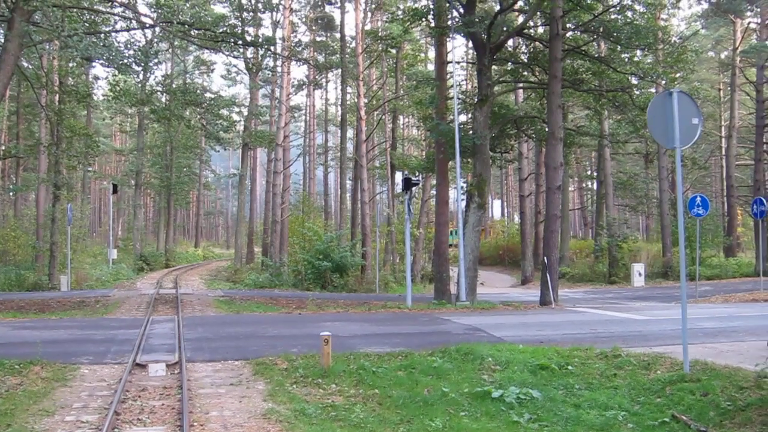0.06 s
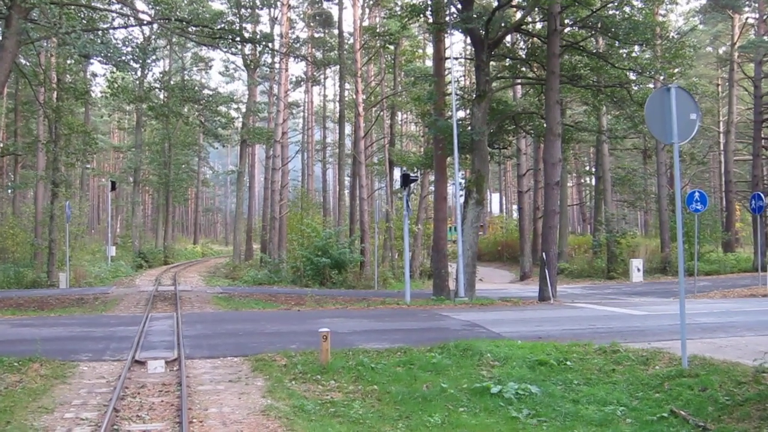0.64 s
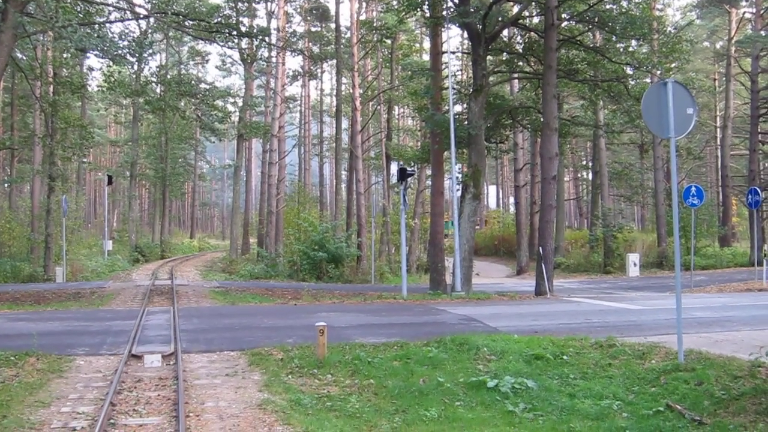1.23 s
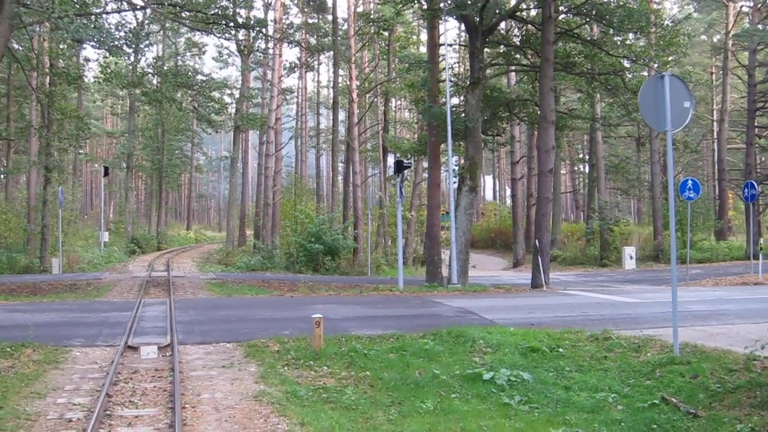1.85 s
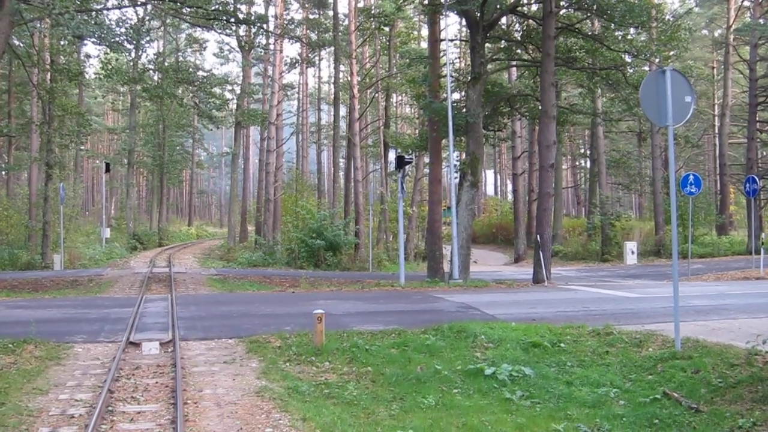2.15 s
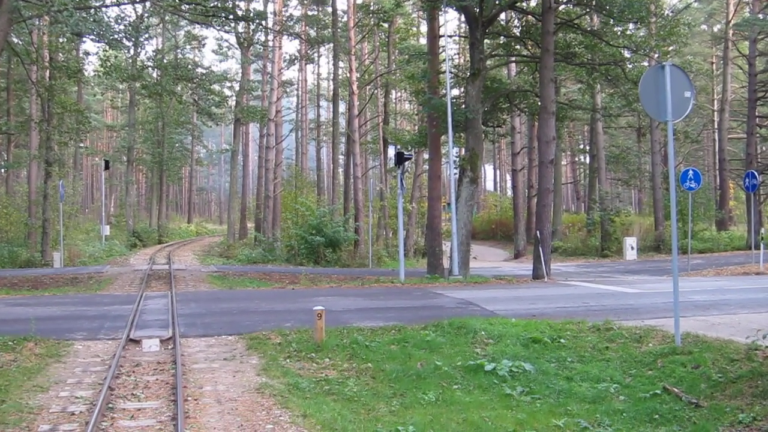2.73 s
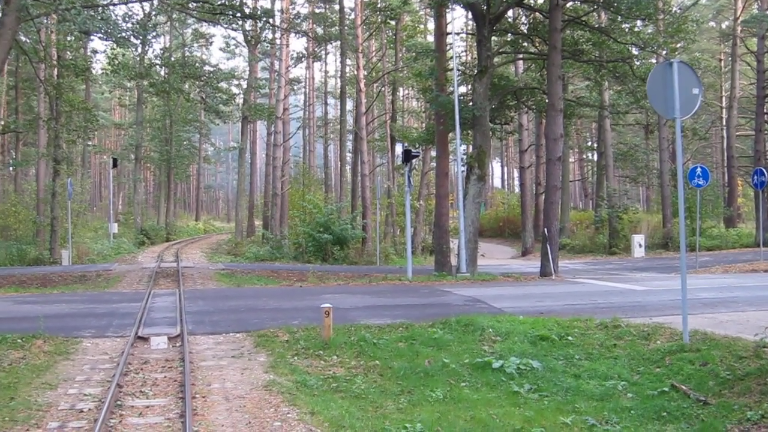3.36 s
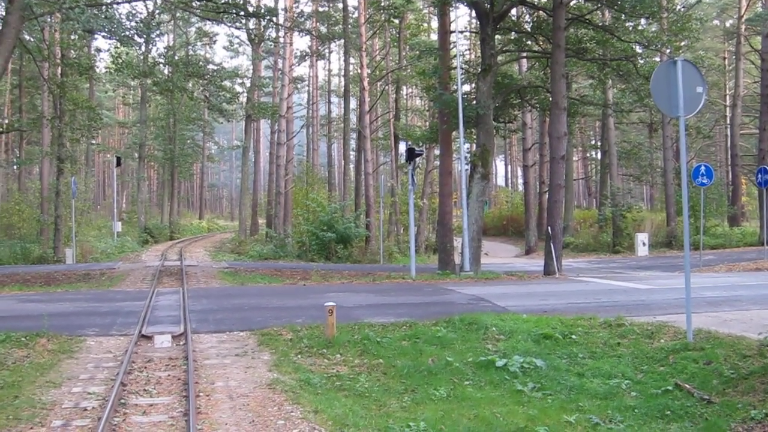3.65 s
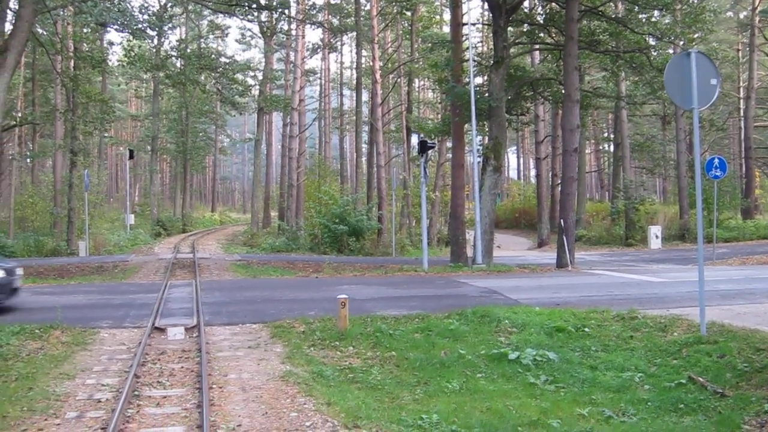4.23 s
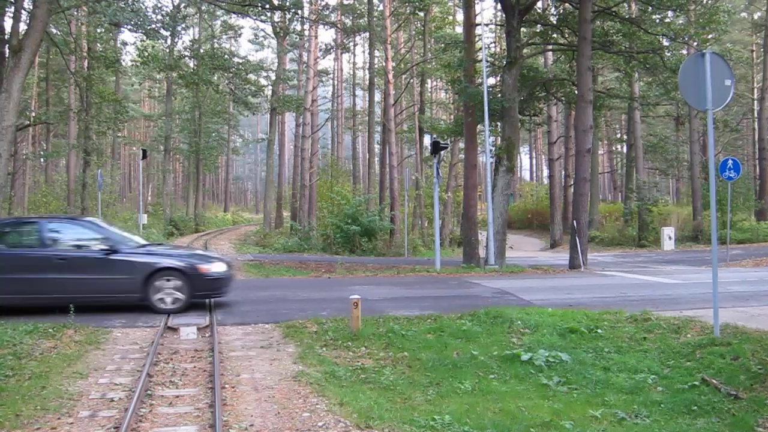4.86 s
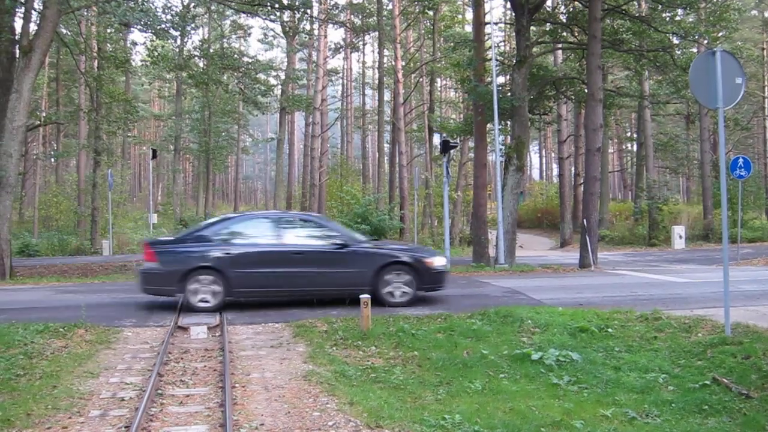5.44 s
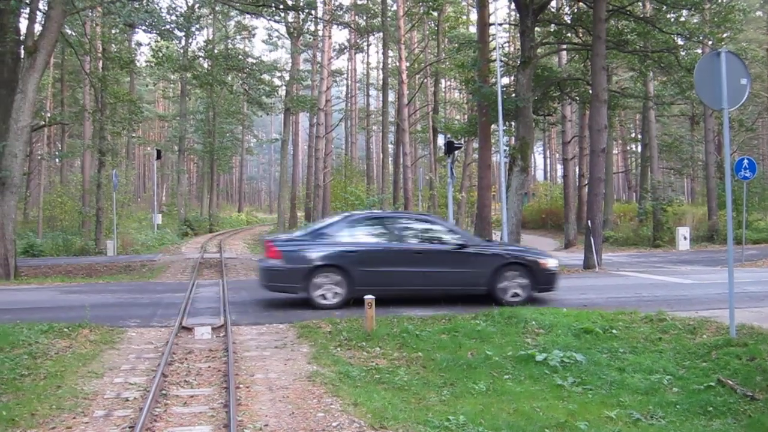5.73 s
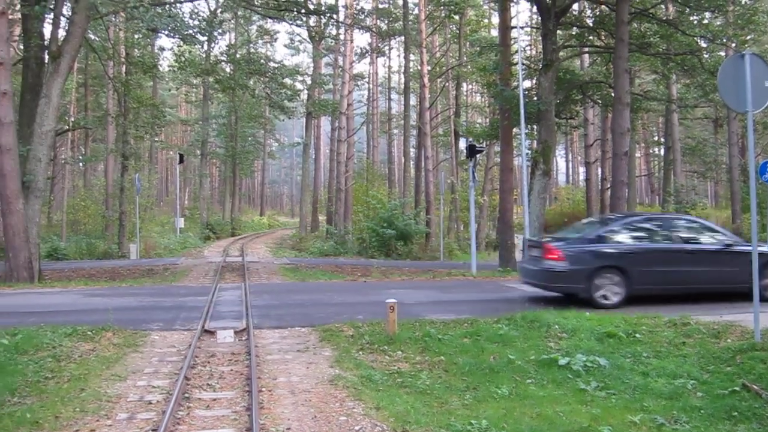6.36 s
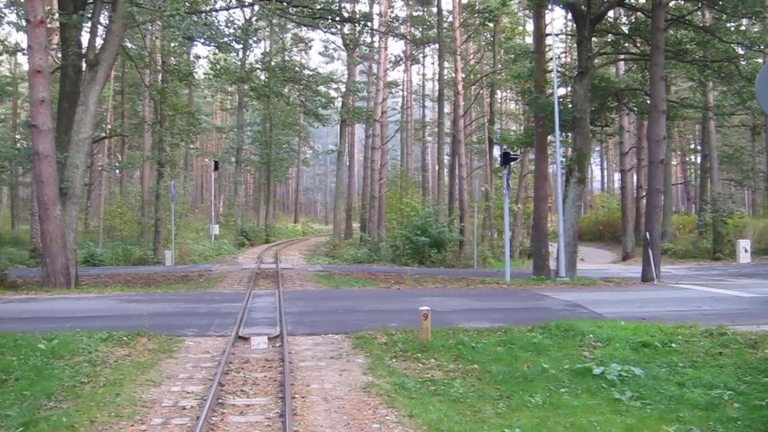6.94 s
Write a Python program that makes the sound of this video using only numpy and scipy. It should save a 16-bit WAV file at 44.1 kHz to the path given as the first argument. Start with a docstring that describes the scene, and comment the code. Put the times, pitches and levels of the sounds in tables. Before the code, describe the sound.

In a forest, over faint outdoor air, a diesel engine ticks over to the left while a thin squeal fades and small ticks sound on the hand-held microphone. The car moves off with a low boom, gathers speed and changes gear. Its clatter, exhaust drone and tyre hiss come closer, the wheels knock over the rails of a level crossing in a quick series of thumps, and it carries on to the right.

```python
"""A five-cylinder diesel idles to the left, under a brief thin squeal and faint ticks of handling.
The car pulls away through the forest, changes gear and passes to the right over a level crossing.
Its firings excite the resonances of the exhaust (a drone) and of the engine bay (a clatter);
the tyres hiss on the road and ring as they thump over both rails. Trunks scatter the sound,
which reaches the two close microphones of a hand-held camera."""
import sys
import numpy as np
from scipy import signal
from scipy.fft import rfft, irfft
from scipy.io import wavfile
from scipy.ndimage import uniform_filter1d, map_coordinates

SR = 44100
rng = np.random.default_rng(int(sys.argv[2]) if len(sys.argv) > 2 else 0)


def put_to_file(sound):
    """Save the sound as 16-bit audio at rate SR, in the file named by the first command-line argument."""
    columns = np.atleast_2d(sound).T  # one column per channel
    safe = np.clip(columns, -1, 1)
    whole_steps = np.round(safe * 32767)
    wavfile.write(sys.argv[1], SR, whole_steps.astype(np.int16))


N = 308259
TIME = np.arange(N) / SR
CRUISE_HZ = 65  # reference firing rate
CLUTCH_S, GRIP_S = 1.05, 1.5  # the clutch slips between these times

# Wheels striking the rails and the uneven road. Each row: start in seconds, level in dB,
# ring pitch in Hz, then thud and rebound in dB relative to the blow.
WHEEL_BLOWS = [(4.9256, -6.5, 569, -17, -6), (5.039, -5.5, 670.8, -22, -8), (5.438, -19.5, 1500, -19, -15),
               (5.4503, -8.5, 580, 1, -7), (5.538, -17.5, 1070, 2.5, 3), (5.553, -11.5, 576, -15, -7),
               (5.916, -13, 903, -16, -26)]
# Spectrum of tread noise. Each row: frequency in Hz, relative level in dB.
TREAD_SPECTRUM = [(100, -14.5), (290, -2), (425, -11), (530, -4.5), (720, 1.5), (830, -2.5), (960, 0),
                  (1200, -15), (1500, -5), (1800, -12), (2100, -10.5), (2600, -12.5), (7000, -24),
                  (15000, -78)]


def undb(db):
    """Decibels to amplitude ratio."""
    return 10 ** (np.asarray(db) / 20)


def unit(x):
    """Normalisation to rms 1."""
    return x / np.sqrt(np.mean(x ** 2))


def curve(points):
    """Linear interpolation of (seconds, value) points at every sample."""
    return np.interp(TIME, *np.transpose(points))


def spectrum_db(hz, points):
    """Interpolation of (Hz, dB) points on a logarithmic frequency axis."""
    point_hz, db = np.transpose(points)
    return np.interp(np.log(hz), np.log(point_hz), db)


def walk(rate_hz):
    """Smoothed random fluctuation with a spread of the order of 1."""
    hold = int(SR / rate_hz)
    steps = np.repeat(rng.standard_normal(N // hold + 1), hold)
    return 1.02 * uniform_filter1d(uniform_filter1d(steps, hold), hold)[:N]


def colour(x, points, size=4096):
    """Minimum-phase filtering by a spectrum of (Hz, dB) points; the result has rms 1."""
    gain = undb(spectrum_db(np.arange(size // 2 + 1) * SR / size + 1, points))
    cepstrum = irfft(np.log(gain))[:size // 2]
    cepstrum[1:] *= 2
    response = irfft(np.exp(rfft(cepstrum, size)))
    return unit(signal.oaconvolve(x, response)[:N])


def resonate(x, hz, width_hz):
    """Two equal resonators in cascade, for steep flanks."""
    b, a = signal.iirpeak(hz, hz / width_hz, fs=SR)
    return signal.lfilter(b, a, signal.lfilter(b, a, x))


def add(track, start_s, sound):
    """Superposition of a sound on a track."""
    i = max(int(start_s * SR), 0)
    track[..., i:i + sound.shape[-1]] += sound[..., :N - i]


def strikes(cycles, db):
    """An impulse train: one pulse per firing cycle, each with its own level."""
    at = np.flatnonzero(np.diff(np.floor(cycles)) > 0)
    pulses = np.zeros(N)
    pulses[at] = undb(db[:len(at)])
    return pulses


def fade(pulses, decay_s):
    """Two first-order lags give each impulse a short rise and an exponential tail."""
    for seconds in (decay_s / 5, decay_s):
        pulses = signal.lfilter([1], [1, -np.exp(-1 / (seconds * SR))], pulses)
    return pulses


def engaged(bite_s=0.054):
    """Friction coupling: 0 while the engine spins free, 1 once the clutch has bitten."""
    return np.clip((TIME - CLUTCH_S) / bite_s, 0, 1)


def diffuse(mid, side, apart_hz=1400):
    """A diffuse field is coherent at two close microphones in the bass, incoherent in the treble."""
    side = signal.sosfilt(signal.butter(2, apart_hz, "high", fs=SR, output="sos"), side)
    return np.array([mid + side, mid - side])


def microphones(x, lead_ms):
    """Path difference: the sound reaches the nearer microphone first."""
    half_lead = lead_ms * SR / 2000
    return np.array([map_coordinates(x, [np.arange(N) + way * half_lead], order=3, mode="nearest")
                     for way in (1, -1)])


def forest_air(level_db=-37.5):
    """Diffuse ambient noise whose level wanders slowly."""
    # Each row: frequency in Hz, relative level in dB.
    air_spectrum = [(18, -34), (35, 0), (140, -1), (185, -11), (255, -10.5), (430, -13.5), (670, -11),
                    (1200, -22), (1660, -20), (2060, -23.5), (6000, -29.5), (7300, -41.5), (10000, -39.5),
                    (15500, -49)]
    mid, side = (colour(rng.standard_normal(N), air_spectrum) for _ in range(2))
    return diffuse(mid, side) * undb(level_db + walk(3.0))


def handling_ticks(faint_db=-51, spread_db=3, faint_s=0.0045, until_s=1.1, rise_s=0.00039, count=16):
    """Friction on the camera's shell: dry noise bursts, with faint random ones as the grip settles."""
    # Each row: start in seconds, level in dB, decay time in seconds.
    clear_ticks = [(.174, -37.5, 0.008), (.495, -42, 0.015), (.525, -44, 0.03), (0.668, -41, 0.006),
                   (1.245, -41, 0.014), (2.4414, -33, 0.0036), (4.0, -38, 0.004)]
    # Each row: frequency in Hz, relative level in dB.
    shell_spectrum = [(500, -36), (3000, 11), (6000, 11), (9000, 0), (13000, 3), (16000, -60)]
    faint_ticks = [(until_s * when, faint_db + spread_db * (2 * size - 1), faint_s)
                   for when, size in rng.random((count, 2))]
    force, t = np.zeros(N), TIME[:SR // 4]
    for start_s, db, decay_s in list(clear_ticks) + faint_ticks:
        add(force, start_s, undb(db) * (1 - np.exp(-t / rise_s)) * np.exp(-t / decay_s))
    return force * np.array([colour(rng.standard_normal(N), shell_spectrum) for _ in range(2)])


def tree_echo(x, t60=0.52, build_s=0.045, echo_db=-11, dull_hz=4500):
    """Scattering from trunks builds a soft, dull reverberant tail."""
    t = TIME[:SR]
    tails = rng.standard_normal((2, SR)) * undb(-60 * t / t60) * (1 - np.exp(-t / build_s))
    tails = signal.sosfilt(signal.butter(1, [300, dull_hz], "band", fs=SR, output="sos"), tails)
    mid, side = (signal.oaconvolve(x, unit(tail))[:N] * np.sqrt(2 * dull_hz) / SR for tail in tails)
    return undb(echo_db) * diffuse(mid, side)


def squeal(end_s=0.57, release_s=.04, fade_db_per_s=12, waver=0.0029):
    """Two thin tones, likely the brakes, with slight random frequency modulation; they soon stop."""
    # Each row: frequency in Hz, initial level in dB.
    partials = [(2928, -43.5), (3058, -44.5)]
    tones = 0
    for hz, db in partials:
        amplitude = undb(db + .5 * walk(40))
        cycles = np.cumsum(hz * (1 + waver * walk(108.8))) / SR
        tones += amplitude * np.sin(2 * np.pi * cycles)
    return tones * undb(-fade_db_per_s * TIME) * np.clip((end_s - TIME) / release_s, 0, 1)


def hiss(hz, near, aspect, intake_db=-42, db_per_octave=12, shade_db=-26, tread_db=-41.5, rear_db=-11):
    """Directivity: under way, the intake hisses forward with the revs, the front tyres sideways."""
    # Each row: frequency in Hz, relative level in dB from the front, then from the side.
    hiss_spectra = [(1500, -38, -51), (3507.5, 4.5, 12), (6060, 7, 1), (7900, -5, -7), (9700, -3.5, 2),
                    (12300, -26, -1), (15500, -13, -14)]
    shadow_db = shade_db * np.maximum(aspect - 0.67, 0)
    intake = undb(intake_db + db_per_octave * np.log2(hz / CRUISE_HZ) + shadow_db)
    tread = undb(tread_db + rear_db * np.maximum(aspect - 1, 0)) * near ** 3
    band_hz, *views_db = np.transpose(hiss_spectra)
    front, flank = (colour(rng.standard_normal(N), np.transpose([band_hz, db])) for db in views_db)
    side_on = np.clip(aspect, 0, 1)
    noise = np.sqrt(1 - side_on) * front + np.sqrt(side_on) * flank
    return np.hypot(intake, tread) * engaged() * noise


def road_rumble(speed, rolling_db=-32, speed_power=3.56, standing_db=-37, jolt_db=-29, jolt_s=0.43):
    """Forced vibration: the uneven road shakes wheels and floor, more with speed and after each bump."""
    # Each row: frequency in Hz, relative level in dB.
    floor_spectrum = [(18, -22), (40, -16), (60, -3.5), (90, -7.5), (135, 1.5), (180, 2), (235, -4.5),
                      (300, -10), (370, -22.5), (800, -48), (2000, -59)]
    jolts = sum(undb(db + thud_db) * (TIME > start_s) * np.exp(-np.abs(TIME - start_s) / jolt_s)
                for start_s, db, _, thud_db, _ in WHEEL_BLOWS)
    rolling = undb(rolling_db) * speed ** speed_power
    power = undb(standing_db) ** 2 + rolling ** 2 + (undb(jolt_db) * jolts / jolts.max()) ** 2
    return np.sqrt(power) * colour(rng.standard_normal(N), floor_spectrum)


def tyre_roar(speed, roar_db=-30.0, speed_power=0.78, standing_db=-43.0, grit_db=1.2):
    """Road roughness modulates tread noise, which grows by a power law of speed out of a faint rush."""
    roar = colour(rng.standard_normal(N) * undb(grit_db * walk(300)), TREAD_SPECTRUM)
    amplitude = np.hypot(undb(standing_db), undb(roar_db) * speed ** speed_power)
    return roar * amplitude * undb(0.1 * walk(34))


def wheel_bumps(contact_s=0.0022, slap_db=-14, slap_s=0.018, thud_hz=260, thud_s=0.006, rubber_hz=1900,
                rebound_s=.0215, rebound_hz=598, rebound_thud_db=-1.5):
    """Impacts and rebounds ring the tyre's modes, slap the tread and thud into the suspension."""
    # Each row: ratio to the ring pitch, time to fall 60 dB in seconds, relative level in dB.
    tyre_modes = [(.84, 0.03, -11), (1, 0.024, 9.6), (1.22, .036, -6), (1.6, 0.016, -27)]
    out, t = np.zeros(N), TIME[:SR // 4]
    tread = colour(rng.standard_normal(N), TREAD_SPECTRUM)
    blows = [row[:-1] for row in WHEEL_BLOWS]
    blows += [(start_s + rebound_s, db + rebound_db, rebound_hz, rebound_thud_db)
              for start_s, db, *_, rebound_db in WHEEL_BLOWS]
    for (start_s, db, hz, thud_db), noise in zip(blows, np.resize(tread, (len(blows), len(t)))):
        ring = sum(undb(mode_db - 60 * t / t60) * np.sin(2 * np.pi * hz * ratio * t)
                   for ratio, t60, mode_db in tyre_modes)
        thud = undb(thud_db) * np.exp(-t / thud_s) * np.sin(2 * np.pi * thud_hz * t)
        slap = undb(slap_db) * noise * np.exp(-t / slap_s)
        add(out, start_s, undb(db) * (1 - np.exp(-t / contact_s)) * (ring + thud + slap))
    # soft rubber rounds off the treble
    return signal.sosfilt(signal.butter(2, rubber_hz, fs=SR, output="sos"), out)


def body_shudder(cycles, shove_db, running_db=-42, clutch_db=-30, ease_db_per_s=5, settle_s=0.047):
    """Impulse excitation: each firing shoves the body, which booms most while the clutch slips."""
    # Each row: frequency in Hz, relative gain in dB.
    body_response = [(20, -66), (40, -6), (60, -4), (90, -3), (135, 1), (180, 0), (225, -15.5),
                     (310, -18.5), (420, -23), (800, -31), (2000, -60)]
    slip = engaged() * np.clip((GRIP_S - TIME) / settle_s, 0, 1)
    judder = slip * undb(clutch_db - ease_db_per_s * (TIME - CLUTCH_S))
    return -np.hypot(undb(running_db), judder) * colour(strikes(cycles, shove_db), body_response)


def effort(hz, throttle, base_db=-35.25, db_per_octave=4.0, throttle_db=7.5):
    """Amplitude of the clatter: excitation grows with firing rate and throttle."""
    return undb(base_db + db_per_octave * np.log2(hz / CRUISE_HZ) + throttle_db * throttle)


def engine_clatter(cycles, knock_db, aspect, knock_s=.0028, scatter_db=1.5, side_wash_db=3.0):
    """Combustion knocks and valve taps excite the bay's resonances; side-on, more wash masks them."""
    # Each row: frequency and width in Hz, relative level in dB from the front, side and rear,
    # share driven by valve taps from 0 to 1, steady wash in dB relative to the blows.
    bay_resonances = [(644, 260, -3.5, 1, -0.5, 0.36, 5.5), (961, 140, -9.5, -8, 12.5, 0.4, -10),
                      (1456, 270, -18.5, -2.5, 4, 0.1, -2), (1629, 166, 4, -2, -22.5, 0.79, -3.5),
                      (1891, 87, 2, -17.5, 12, 0.4, -11.5), (2112, 220, -37, 0, 3.5, 0.47, -1.5),
                      (2326, 185, -9.5, -1, -50, 0.34, -5), (2824, 440, -19.5, -8, 0, 0.5, -4),
                      (3190, 410, -5.5, -3, -7, 1, 1), (3428, 186, -7, -5, -5, 1, -8),
                      (3940, 900, 1.5, -11.5, -13, 0.44, -11), (5020, 920, -6, -13, -21, 0.3, -2),
                      (6090, 1240, -7, -13.5, -54, 0.5, -1)]
    knocks = unit(fade(strikes(cycles, knock_db), knock_s))
    taps = unit(fade(strikes(cycles + 0.303, rng.standard_normal(len(knock_db))), knock_s))
    out, power = 0, 0
    for hz, width_hz, *facing_db, tap_share, wash_db in bay_resonances:
        # every blow catches each resonance a little differently
        blows = unit(((1 - tap_share) * knocks + tap_share * taps) * undb(scatter_db * walk(130)))
        wash = undb(wash_db + side_wash_db * np.minimum(aspect, 1))
        force = np.hypot(blows, wash) / np.hypot(1, wash)
        gain = undb(np.interp(aspect, np.arange(3), facing_db))
        out += gain * unit(resonate(force * rng.standard_normal(N), hz, width_hz))
        power += gain ** 2
    return out / np.sqrt(power)


def exhaust_drone(cycles, hz, throttle, near, db_per_octave=5, free_db=-10, near_power=.1):
    """Source and filter: the firing harmonics sweep through the resonances of the exhaust pipe."""
    # Pipe and silencer. Each row: frequency in Hz, level in dB.
    pipe_response = [(30, -34), (45, -45), (53, -31), (62, -25.5), (70, -24.5), (76, -29), (90, -28.5),
                     (110, -34.5), (136, -25.5), (150, -32), (178, -32), (198, -31), (220, -44.5),
                     (280, -56), (315, -40), (380, -46.5)]
    # Each entry: change in dB from closed to full throttle, for harmonics one to five.
    throttle_gains = [-0.5, -1, 7.5, 4.5, 8.5]
    # Unequal cylinders add weak, unsteady orders between the harmonics.
    # Each row: multiple of the firing rate, level in dB relative to the third harmonic.
    weak_orders = [(0.8, -36), (1.201, -19), (1.401, -7.5), (1.601, -31), (2.399, -21), (2.598, -18),
                   (4.8, -16)]
    load_db = db_per_octave * np.log2(hz / CRUISE_HZ) + free_db * (1 - engaged())
    harmonics_db = [spectrum_db(k * hz, pipe_response) + load_db + db * (throttle - 1)
                    for k, db in enumerate(throttle_gains, 1)]
    drone = sum(-undb(db + walk(18)) * np.cos(2 * np.pi * k * cycles)
                for k, db in enumerate(harmonics_db, 1))
    for multiple, db in weak_orders:
        amplitude = undb(harmonics_db[2] + db + 2 * walk(7.2))
        drone += amplitude * np.cos(2 * np.pi * (multiple * cycles + rng.random()) + .5 * walk(18))
    # the drone stays almost equally loud as the car nears and passes
    return np.sqrt(2) * drone * near ** near_power


def pass_by(abeam_s=5.7, road_m=13.96, engine_ahead_m=4.5, end_on_rad=1.33, mic_gap_ms=0.13):
    """Geometry of a straight pass; speed and nearness (inverse distance) are 1 with the car abeam."""
    # Each row: time in seconds, speed in metres per second.
    road_speeds = [(1.05, 0.5), (1.9, 3), (3.7, 5.5), (4.2, 5), (6.99, 5.5)]
    speed = curve(road_speeds)
    along_m = np.cumsum(speed) / SR
    along_m -= np.interp(abeam_s, TIME, along_m)
    distance_m = np.hypot(along_m, road_m)
    bearing = np.arctan((along_m + engine_ahead_m) / road_m)
    aspect = np.clip(1 + bearing / end_on_rad, 0, 2)  # 0 front, 1 side, 2 rear
    left_lead_ms = -mic_gap_ms * along_m / distance_m
    return speed / np.interp(abeam_s, TIME, speed), road_m / distance_m, aspect, left_lead_ms


def scene():
    """Superposition of the car's direct sound, its echo, forest air and handling."""
    # Idle, first gear, gear change, second gear. Each row: time in seconds, firing rate in Hz.
    firing_rates = [(0.0, 28.58), (0.71, 29.12), (0.87, 29.2), (1.1, 41.33), (1.15, 43.7), (1.5, 45.5),
                    (1.75, 52.77), (2.0, 55.96), (2.66, 59.33), (3.26, 65.98), (3.7, 72.2), (4.22, 63.04),
                    (5.57, 67.9), (6.07, 69.5), (6.92, 74.38)]
    # The driver pulls away, lifts for the gear change and eases off after the rails.
    # Each row: time in seconds, throttle from 0 to 1.
    pedal = [(.95, 0.4), (1.12, 0.61), (2, 0.93), (3.15, 0.68), (3.5, 0.09), (4.05, 0.45), (4.45, 0.95),
             (5.35, 0.98), (6.2, 0.13), (6.48, 0.76), (6.99, .45)]
    # The five cylinders in firing order. Each row: relative knock and shove in dB.
    cylinders = [(9.5, 20.5), (6, 19), (3, -42), (-14, -41), (6.5, 15.5)]
    hz, throttle = curve(firing_rates), curve(pedal)
    speed, near, aspect, lead_ms = pass_by()
    cycles = np.cumsum(hz) / SR + 1 / 3  # one cycle per firing
    firings = np.resize(cylinders, (N // 400, 2))
    knock_db, shove_db = (firings + rng.standard_normal(firings.shape)).T
    clatter = effort(hz, throttle) * engine_clatter(cycles, knock_db, aspect)
    rolling = tyre_roar(speed) + road_rumble(speed)
    car = near * (clatter + rolling) + body_shudder(cycles, shove_db) + wheel_bumps() + squeal()
    airy = near * hiss(hz, near, aspect)
    direct = microphones(car + exhaust_drone(cycles, hz, throttle, near), lead_ms)
    direct += microphones(airy, lead_ms) * undb([[1.8], [-4]])  # the left microphone is brighter
    return direct + forest_air() + tree_echo(car + airy) + handling_ticks()


def record(dry, notch_hz=8230, top_hz=15700):
    """Mid-side filtering shapes the camera's stereo width; a treble notch and a low-pass follow."""
    # Each row: frequency in Hz, gain of the side signal in dB.
    stereo_width = [(60, -3), (140, -20), (280, 6.5), (600, -2.5), (1200, -5.5), (2200, 2), (4500, 0.5),
                    (15000, -0.5)]
    side_gain = undb(spectrum_db(np.arange(N // 2 + 1) * SR / N + 1, stereo_width))
    mid = (dry[0] + dry[1]) / 2
    side = irfft(rfft((dry[0] - dry[1]) / 2) * side_gain, N)
    notch = signal.butter(2, [notch_hz - 380, notch_hz + 380], "bandstop", fs=SR, output="sos")
    low_pass = signal.ellip(10, .2, 80, top_hz, fs=SR, output="sos")
    return signal.sosfilt(np.vstack([notch, low_pass]), np.array([mid + side, mid - side]))


dry = scene()
out = record(dry)
put_to_file(out)
```